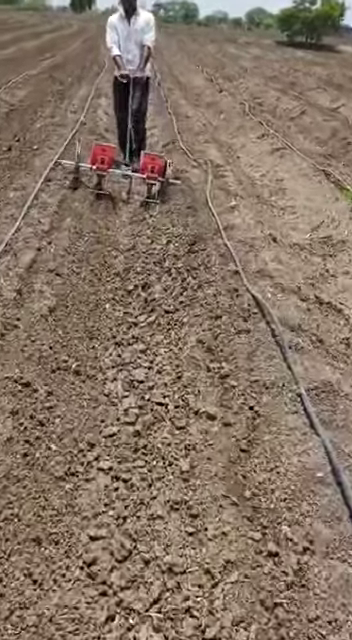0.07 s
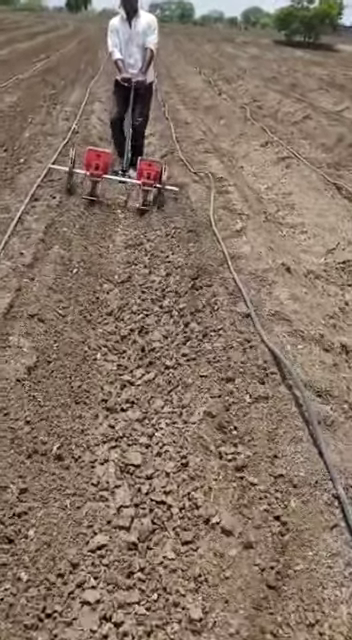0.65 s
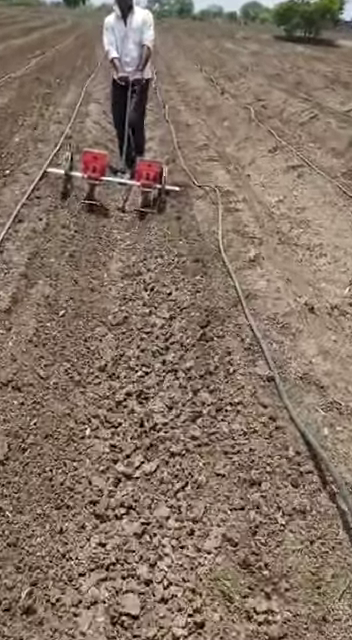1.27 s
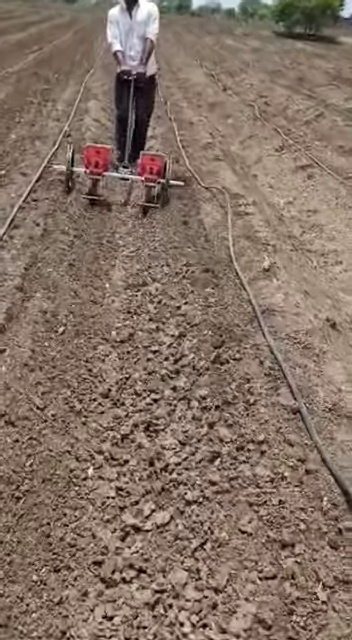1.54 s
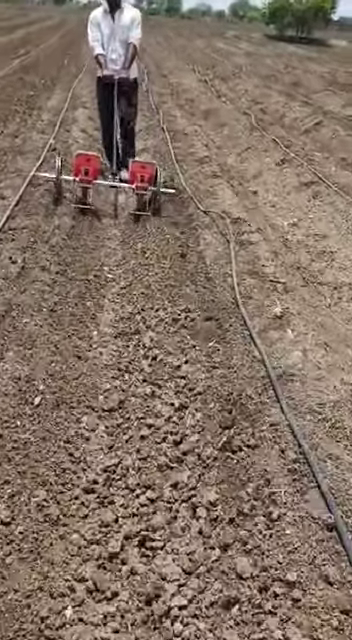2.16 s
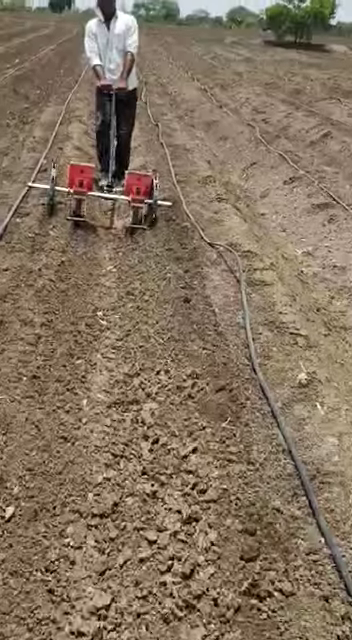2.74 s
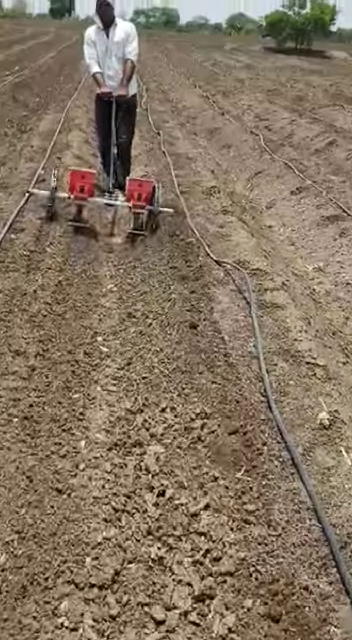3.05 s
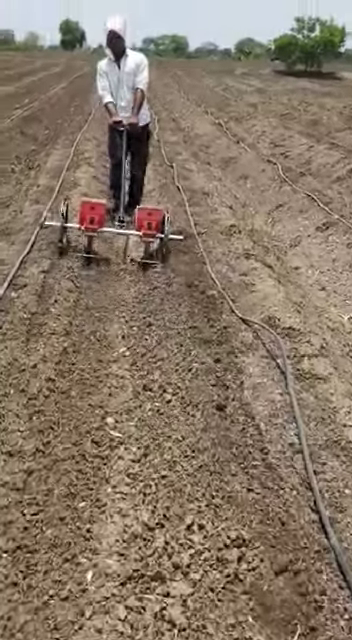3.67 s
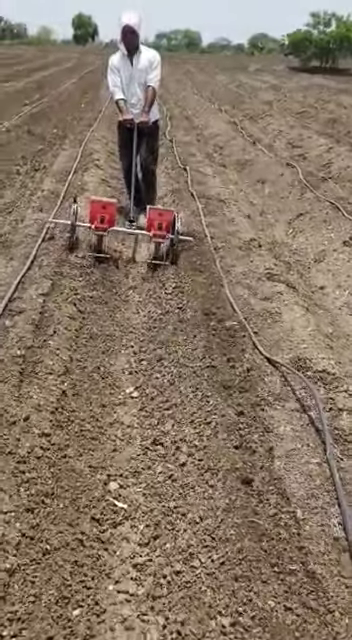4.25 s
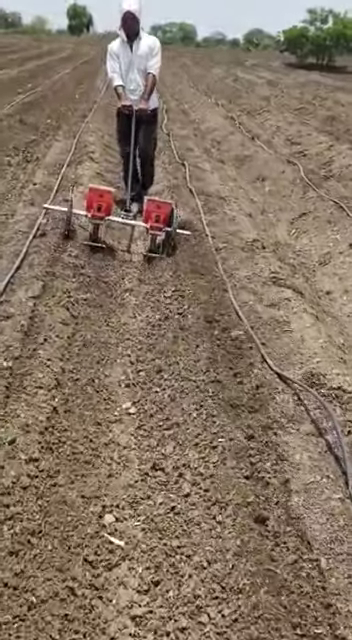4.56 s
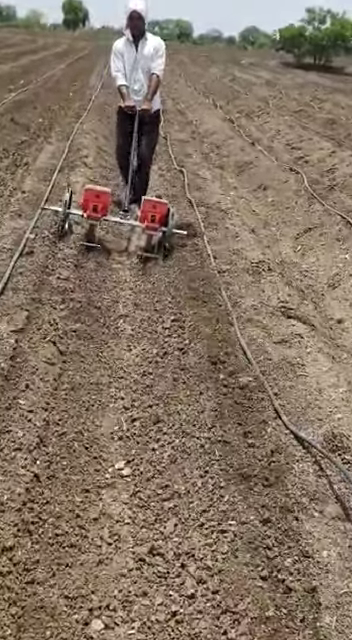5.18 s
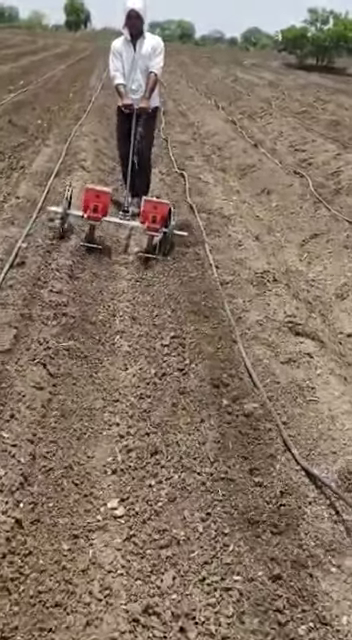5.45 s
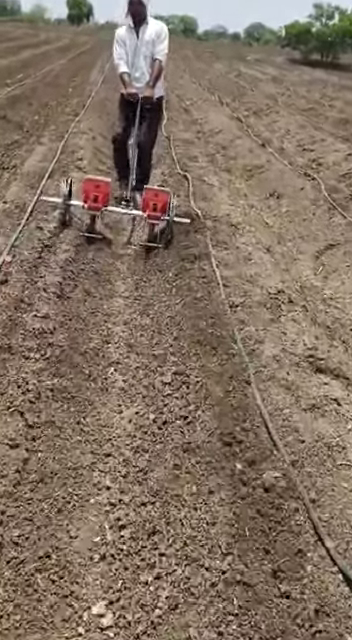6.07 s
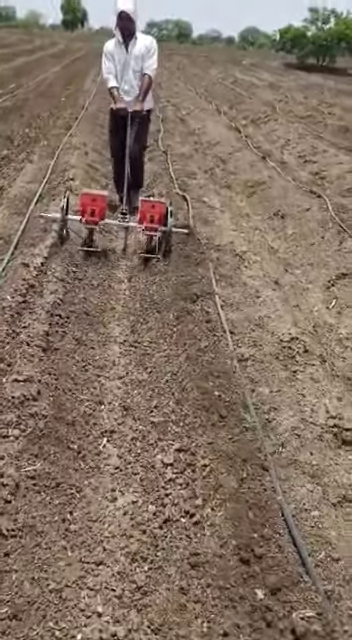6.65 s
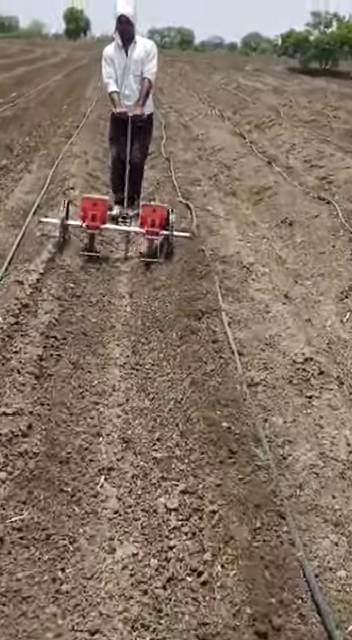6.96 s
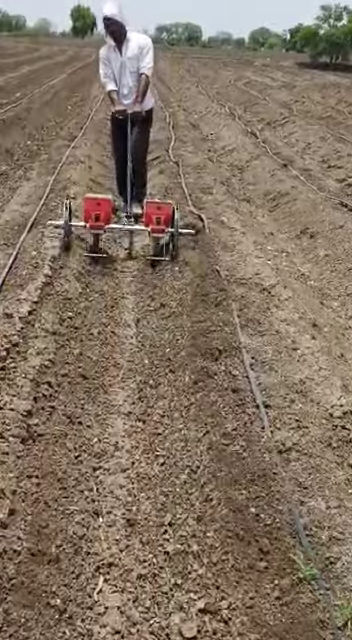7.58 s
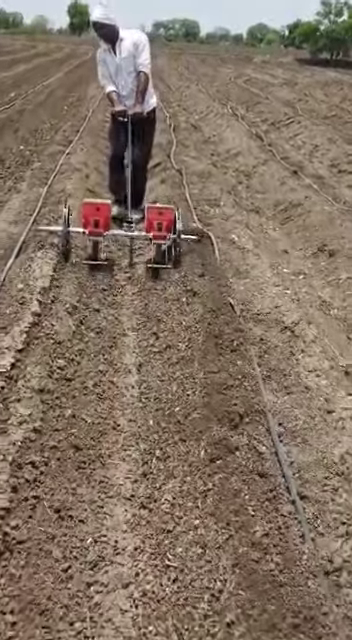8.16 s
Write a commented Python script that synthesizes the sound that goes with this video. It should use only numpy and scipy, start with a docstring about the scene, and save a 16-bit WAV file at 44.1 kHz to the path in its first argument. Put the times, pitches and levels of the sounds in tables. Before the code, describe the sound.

Wind buffets the microphone over the uneven metal clanking of a seed drill being pushed across a field, with soft footsteps.

```python
"""A hand-pushed two-row seed drill clanks and rattles over dry tilled soil, a few metres away.
Impacts in its loose joints excite the damped modes of the steel frame and drive, and two faint, high
squeaks slip in. Close footsteps crush clods in bursts of tiny fractures. Turbulence in a light
wind rumbles and pops on the microphone, over a steady high hiss and the hush of open land."""
import sys
import numpy as np
from scipy import signal
from scipy.fft import rfft, irfft
from scipy.io import wavfile
from scipy.ndimage import uniform_filter1d, minimum_filter1d

SR = 44100
rng = np.random.default_rng(int(sys.argv[2]) if len(sys.argv) > 2 else 0)


def dump_mix(stems):
    """Bounce the given channels to the path in sys.argv[1] as a 16-bit WAV at rate SR."""
    frames = np.atleast_2d(stems).T  # one column per channel
    limited = np.clip(frames, -1, 1)  # hard clip at full scale
    pcm = np.round(limited * 32767).astype(np.int16)
    wavfile.write(sys.argv[1], SR, pcm)


N = 371322
T = np.arange(N) / SR

# Loud knocks: start_s, frame_db, pitch_hz, drive_db, bar_db (levels before each part's own gain)
CLANKS = [(0.3364, -32.5, 1490, -52, -46), (0.394, -30, 1520, -49, -46), (0.4157, -25.5, 1450, -39, -43),
          (0.7476, -31, 1580, -42.5, -50), (0.7976, -24.5, 1530, -42, -43), (1.0438, -28.5, 1500, -42, -44),
          (1.2026, -26, 1520, -43, -44.5), (1.2693, -31, 1470, -47, -40), (1.3376, -19, 1450, -33, -30.5),
          (1.4227, -31.5, 1680, -55, -43), (1.55, -28.5, 1480, -43.5, -41), (1.708, -29, 1640, -52, -47),
          (1.8888, -21.5, 1590, -44.5, -39), (2.2323, -32.5, 1660, -52, -63), (2.4908, -28, 1540, -46, -52),
          (2.5398, -29.5, 1810, -48, -53), (2.7329, -34, 1500, -59, -51), (3.0257, -29.5, 1330, -42.5, -56),
          (3.1808, -29.5, 1450, -46, -39), (3.2573, -19.5, 1460, -36, -35), (3.3, -23.5, 1680, -37, -41),
          (3.5792, -19, 1690, -30.5, -46), (4.3565, -29, 1560, -44, -49), (4.8416, -29.5, 1830, -32, -58),
          (4.9836, -21, 1550, -36, -31), (5.008, -18, 1640, -32.5, -47), (5.2203, -37.5, 1570, -49, -52),
          (5.5294, -27, 1600, -41, -45), (5.72, -27, 1450, -41, -48), (5.9481, -30, 1550, -43, -55),
          (6.1129, -32, 1470, -46, -45), (6.2935, -32.5, 1490, -56, -45), (6.3257, -30, 1550, -44.5, -46),
          (6.361, -26.5, 1670, -49, -57), (6.403, -27.5, 1480, -46.5, -43),
          (6.4711, -23.5, 1530, -38, -40.5), (6.5965, -29, 1490, -49, -48), (6.8012, -36.5, 1500, -54, -44),
          (6.8816, -21, 1620, -30.5, -36), (6.9805, -20.5, 1540, -33, -40), (7.0663, -25, 1500, -50, -41),
          (7.0917, -22.5, 1840, -38, -37), (7.2069, -25.5, 1860, -45.5, -52),
          (7.3474, -16.5, 1610, -34.5, -33.5), (7.4924, -33, 1500, -55, -47), (7.5692, -31, 1490, -42, -50),
          (7.6068, -26, 1460, -43.5, -42), (7.8046, -24.5, 1540, -40, -41), (7.9361, -25, 1520, -42, -43),
          (7.9858, -29, 1200, -42.5, -55), (8.1983, -16.5, 1530, -33.5, -35),
          (8.4085, -24, 1600, -40.5, -49)]
# Modes of the steel frame: pitch_hz, relative_db, t60_s
FRAME_MODES = [(282, -8, 0.065), (385, -10.5, 0.086), (560, -24, 0.032), (695, -21.5, 0.12),
               (916, -22.5, 0.019), (1077, -26, 0.092), (1204, -10, 0.053), (1403, 0.5, 0.012),
               (1534, -17.5, 0.089), (1584, -1.5, 0.025), (1670, -7, 0.028), (1826, -5.5, 0.031),
               (2010, -9.5, 0.023), (2255, -6, 0.016), (2325, -8, 0.016), (2646, -24, 0.1),
               (2855, -9.5, 0.013), (3330, -24.5, 0.015)]
# Modes of the small drive parts: pitch_hz, relative_db, t60_s
DRIVE_MODES = [(4180, -10, .01), (4810, -1.5, 0.008), (5230, 11.5, 0.011), (5680, 5, 0.03),
               (6345, 10, 0.02), (6850, 15.5, 0.011), (7024, 5, 0.024), (7620, 2, 0.012), (9190, -7, 0.019),
               (10870, -4, 0.0047), (10400, 5, 0.0092), (13900, -15, .01)]

def drill_clanks():
    """Impact excitation: each knock of a loose joint sets the frame, the drive and one bar ringing."""
    frame_gain_db, drive_gain_db, bar_gain_db = -3, 2.5, 1.5
    out = np.zeros(N)
    for start_s, frame_db, pitch_hz, drive_db, bar_db in CLANKS:
        frame = modal_response(FRAME_MODES, pitch_hz, focus_db=3, scatter_db=2.5, detune=.028)
        drive = modal_response(DRIVE_MODES, 5200, focus_db=-2, scatter_db=2, detune=.035)
        clang = strike(frame, contact_s=.015, bounce_s=.0048, bounce=.18, scrape=.035, crack=.0094)
        clink = strike(drive, contact_s=.0076, bounce_s=.004, bounce=.095, scrape=.038, crack=.098)
        add(out, start_s, undb(frame_db + frame_gain_db) * clang)
        add(out, start_s, undb(drive_db + drive_gain_db) * clink)
        add(out, start_s, undb(bar_db + bar_gain_db) * loose_bar())
    return out

def modal_response(modes, centre_hz, focus_db, scatter_db, detune):
    """Modal superposition: damped sines, varied with each blow and weighted around centre_hz."""
    hz, db, t60_s = np.transpose(modes)[:, :, None]
    t = T[:SR // 5]
    level_draw, pitch_draw, phase = rng.standard_normal((3, len(modes), 1))
    nearness = np.exp(-(np.log2(hz / centre_hz) / .22) ** 2)
    gain = undb(db + scatter_db * level_draw + focus_db * nearness)
    hz = hz * (1 + detune * pitch_draw * t60_s.min() / t60_s)  # heavily damped modes shift most
    return np.sum(gain * np.exp(-np.log(1000) * t / t60_s) * np.sin(2 * np.pi * (hz * t + phase)), 0)

def strike(response, contact_s, bounce_s, bounce, scrape, crack):
    """Convolution: the force of a gritty contact and its rebound drives a part's impulse response."""
    t = T[:SR // 25]
    contact = np.exp(-t / contact_s)
    force = scrape * rng.standard_normal(len(t)) * contact
    force[0] += 1
    rebound_at = int(np.clip(bounce_s * rng.uniform(.7, 1.3) * SR, 1, len(t) - 1))
    force[rebound_at] += bounce * rng.choice([-1, 1])
    x = signal.fftconvolve(force, response)
    x /= np.sqrt(uniform_filter1d(x ** 2, size=SR // 200).max())  # loudest 5 ms to rms 1
    x[:len(t)] += crack * rng.standard_normal(len(t)) * contact
    return x * (1 - np.exp(-T[:len(x)] / .00039))

def loose_bar(pitch_hz=1494, t60_s=.23, rise_s=.0031):
    """Free vibration: one loosely held bar rings on, at a slightly different pitch each time."""
    t = T[:SR // 3]
    hz = pitch_hz * (1 + .005 * rng.standard_normal())
    envelope = np.exp(-np.log(1000) * t / t60_s) * (1 - np.exp(-t / rise_s))
    return envelope * np.sin(2 * np.pi * hz * t)

# Level of the faintest rattles, higher on rough ground: time_s, level_db
RATTLE_FLOOR = [(0, -51.5), (1.4, -51), (2.1, -60), (3.2, -53), (4.0, -62), (5.9, -55.5), (6.6, -52),
                (8.4, -57)]

def drill_rattles(count=200, range_db=16):
    """Play in the joints: light, uneven impacts excite the frame's modes, most of them faintly."""
    out = np.zeros(N)
    for k, (late, size) in enumerate(rng.random((count, 2))):
        frame = modal_response(FRAME_MODES, 1760, focus_db=0, scatter_db=2, detune=.013)
        rattle = strike(frame, contact_s=.0092, bounce_s=.0062, bounce=.54, scrape=.072, crack=.06)
        start_s = (k + 2 * late) / count * N / SR
        add(out, start_s, undb(range_db * size ** 2) * rattle)
    return out * undb(curve(RATTLE_FLOOR))

# Brief faint metal tones, one frame ring and two higher squeaks: start_s, length_s, pitch_hz, level_db
METAL_TONES = [(0.6, 0.086, 1517, -45), (0.675, 0.064, 4900, -55), (3.32, 0.089, 2680, -55)]

def metal_tones():
    """Single-mode vibration: faint pure tones swell and fade, one frame ring and two higher squeaks."""
    out = np.zeros(N)
    for start_s, length_s, pitch_hz, level_db in METAL_TONES:
        t = T[:int(length_s * SR)]
        envelope = np.sin(np.pi * t / length_s)
        add(out, start_s, undb(level_db) * envelope * np.sin(2 * np.pi * pitch_hz * t))
    return out

# Feet pressing on the soil: start_s, length_s, crunch_db, dust_db
STEPS = [(0.145, 0.11, -40.5, -47), (0.806, 0.095, -40, -49), (0.94, 0.2, -48, -59), (1.53, 0.26, -50, -74),
         (2.29, 0.16, -46.5, -59), (2.881, 0.093, -55.5, -52), (3.035, 0.068, -46.5, -61),
         (3.658, 0.27, -50, -54), (4.505, 0.17, -45.5, -62), (5.25, 0.27, -50, -56),
         (6.127, 0.23, -50.5, -54), (6.975, 0.17, -45, -62), (7.788, 0.052, -45.5, -50)]
# Spectra of coarse grains and of fine dust: frequency_hz, relative_db
CRUNCH_SPECTRUM = [(500, 7), (1000, 4), (2000, 1.5), (3000, -3.5), (4500, -2), (6500, -9.5), (9000, -13),
                   (15500, -28)]
DUST_SPECTRUM = [(4000, 5), (7000, -0.5), (11000, -3), (15500, -5)]

def footsteps():
    """Granular crushing: clods break in dense random impulses whose level follows the foot's load."""
    crunch_gain, dust_gain, t = np.zeros(N), np.zeros(N), T[:SR // 2]
    for start_s, length_s, crunch_db, dust_db in STEPS:
        landing = np.minimum(t / .012, 1)
        easing = np.exp(-.3 * t / length_s)
        settling = np.exp(-np.maximum(t - .85 * length_s, 0) / .045)
        load = landing * easing * settling
        add(crunch_gain, start_s, undb(crunch_db) * load)
        add(dust_gain, start_s, undb(dust_db) * load)
    crumbling = undb(2.3 * wander(40) + 2 * wander(150))
    crunch = colour(grains(rate_hz=3200, spread_db=4.5), CRUNCH_SPECTRUM)
    dust = colour(grains(rate_hz=2500, spread_db=5), DUST_SPECTRUM)
    return crumbling * (crunch_gain * crunch + dust_gain * dust)

# Crumbs of earth breaking underfoot: start_s, peak_db, pitch_hz
CRUMBS = [(0.509, -35, 12100), (2.4244, -41, 12100), (2.9146, -35.5, 8210), (2.9537, -35, 13500),
          (3.3978, -33.5, 12000), (4.9028, -40, 8700), (5.668, -35.5, 12100), (8.0227, -36, 14400),
          (8.14, -32.5, 11900)]

def crumbs(trickle_count=130):
    """Brittle fracture: single crumbs snap, and tiny ones keep trickling from the disturbed soil."""
    out = np.zeros(N)
    for start_s, peak_db, pitch_hz in CRUMBS:
        add(out, start_s, undb(peak_db) * snap(pitch_hz))
    for when, size, pitch in rng.random((trickle_count, 3)):
        pitch_hz = 5500 + 9000 * pitch
        add(out, when * N / SR, undb(-50.5 + 9.6 * size ** 2) * snap(pitch_hz))
    return out

def snap(pitch_hz, decay_s=.003):
    """Damped resonance: a breaking crumb's burst of noise gathers round one pitch; peak 1."""
    t = T[:SR // 40]
    burst = rng.standard_normal(len(t)) * np.exp(-t / decay_s)
    x = signal.lfilter(*signal.iirpeak(pitch_hz, Q=4, fs=SR), burst)
    return x / np.abs(x).max()

# Strength of the breeze at the microphone: time_s, rumble_db
BREEZE = [(0, -36), (0.16, -23.5), (0.6, -26.5), (1.35, -22.5), (1.98, -30.5), (2.85, -30), (3.9, -33),
          (4.05, -39), (4.3, -32.5), (5.1, -33.5), (5.55, -34.5), (6.24, -29.5), (6.33, -35), (6.67, -38),
          (6.8, -31), (8.4, -25)]
# Gusts that swell over the breeze: crest_s, half_length_s, rumble_db, flutter_db
GUSTS = [(0.264, 0.017, -32, -30), (0.374, 0.028, -16.5, -38), (0.877, 0.17, -37, -12.5),
         (1.118, 0.046, -21, -18.5), (1.255, 0.029, -8.5, -30), (1.679, 0.087, -13, -24.5),
         (2.512, 0.085, -22, -40), (3.82, 0.083, -24.5, -41), (4.746, 0.011, -21, -62),
         (5.935, 0.025, -16, -38.5), (6.212, .05, -28, -37), (6.763, 0.027, -23.5, -53),
         (7.362, 0.037, -22, -44), (7.456, 0.032, -21, -49), (7.72, 0.034, -20, -37),
         (8.34, 0.026, -15, -24.5)]
# Single eddies, each a broad swirl round a tight, fast core: time_s, swirl_db, core_db
EDDIES = [(0.184, -17, -30.5), (0.275, -23, -13.5), (0.629, -20, -13.5), (0.681, -17, -16),
          (0.718, -16, -8.5), (0.95, -8, -15), (1.035, -14, -8.5), (1.143, -3.5, -48), (1.479, -14, -37),
          (1.568, -21, -21.5), (1.832, -37, -18), (2.432, -20, -50), (2.626, -16, -35), (2.733, -17, -54),
          (2.795, -14, -63), (3.029, -15, -28.5), (3.565, -19, -38), (3.606, -11.5, -30), (4.454, -22, -24),
          (4.521, -22, -27.5), (4.953, -20.5, -26), (5.147, -14, -28), (5.175, -19, -17.5),
          (5.793, -17, -61), (6.149, -11, -29.5), (6.221, -9.5, -16.5), (6.256, -14.5, -29),
          (6.953, -12, -31), (7.435, -17, -50), (7.987, -7, -2.5), (8.003, -2.5, -24), (8.057, -2, -1.5),
          (8.194, -10.5, -22.5), (8.326, -33, -4.5), (8.349, -9, -17), (8.379, -25, -9)]
# Spectra of the wind's low rumble and higher flutter: frequency_hz, relative_db
RUMBLE_SPECTRUM = [(20, -38), (35, -16.5), (55, -3.5), (80, 1), (115, 3.5), (170, -5.5), (240, -11),
                   (330, -25), (500, -55.5), (900, -83)]
FLUTTER_SPECTRUM = [(100, -10.5), (200, 3), (320, 1.5), (450, -5.5), (600, -15), (800, -28), (1100, -38.5),
                    (2000, -63)]

def wind(swirl_hz=153, core_hz=267, wake_db=-3, wake_s=.0072):
    """Turbulent pressure on the microphone: breeze and gusts rumble and flutter, and eddies pop."""
    rumble_gain = undb(curve(BREEZE))
    flutter_gain = undb(-15) * rumble_gain
    for crest_s, half_length_s, rumble_db, flutter_db in GUSTS:
        swell = np.exp(-((T - crest_s) / half_length_s) ** 2)
        rumble_gain = np.hypot(rumble_gain, undb(rumble_db) * swell)  # powers add
        flutter_gain = np.hypot(flutter_gain, undb(flutter_db) * swell)
    pops = np.zeros(N)
    wake = np.exp(-np.abs(T[:SR // 10] - .033) / wake_s)  # flutter crests just behind each eddy
    for time_s, swirl_db, core_db in EDDIES:
        pop = undb(swirl_db) * eddy(swirl_hz) + undb(core_db) * eddy(core_hz)
        add(pops, time_s - .009, rng.choice([-1, 1]) * pop)
        add(flutter_gain, time_s - .027, undb(core_db + wake_db) * wake)
    buffeting = wander(22)
    rumble = steady(colour(grains(rate_hz=300, spread_db=1.5), RUMBLE_SPECTRUM)) * undb(3 * buffeting)
    sputter = grains(rate_hz=330, spread_db=1) * undb(3 * wander(60))
    flutter = steady(colour(sputter, FLUTTER_SPECTRUM)) * undb(.68 * buffeting)
    return pops + rumble_gain * rumble + flutter_gain * flutter

def eddy(hz):
    """A passing vortex: one pressure swing, the derivative of a Gaussian, centred in 24 ms; peak 1."""
    phase = 2 * np.pi * hz * (T[:int(.024 * SR)] - .012)
    return phase * np.exp((1 - phase ** 2) / 2)

# Spectra of the high hiss and the lower hush: frequency_hz, relative_db
HISS_SPECTRUM = [(1470, -49), (2500, -31), (2740, 2.5), (3000, -14), (3270, -8.5), (3720, -19), (4200, -6),
                 (4640, -7), (5490, 3.5), (7170, -1.5), (8810, -24), (11000, -9.5), (12600, -15),
                 (14700, -7), (15500, -11.5)]
HUSH_SPECTRUM = [(200, -26), (500, -3), (900, -3), (1500, 4), (2500, -6.5), (4000, -12.5)]

def field(hiss_db=-55.5, hush_db=-55):
    """Broadband noise: a steady high hiss lies over the faint, wavering hush of open land."""
    hiss = colour(rng.standard_normal(N), HISS_SPECTRUM) * undb(.5 * wander(14))
    hush = colour(rng.standard_normal(N), HUSH_SPECTRUM) * undb(1.5 * wander(9))
    return undb(hiss_db) * hiss + undb(hush_db) * hush

def undb(db):
    """Decibels to amplitude ratio."""
    return 10 ** (np.asarray(db) / 20)

def curve(table):
    """Linear interpolation of (time_s, value) rows at every sample."""
    return np.interp(T, *np.transpose(table))

def add(out, start_s, x):
    """Superposition: mix x into out from start_s."""
    i = int(np.clip(start_s * SR, 0, N - 1))
    out[i:i + len(x)] += x[:N - i]

def colour(x, spectrum):
    """Spectral shaping by (frequency_hz, relative_db) rows, rolled off beyond both ends; rms 1."""
    hz, db = np.transpose(spectrum)
    f = np.maximum(np.fft.rfftfreq(N, 1 / SR), 1)
    skirts = 1 / (1 + (hz[0] / 2 / f) ** 4) / (1 + (f / 2 / hz[-1]) ** 4)
    gain = undb(np.interp(np.log(f), np.log(hz), db))
    shaped = irfft(rfft(x) * skirts * gain, N)
    return shaped / np.sqrt(np.mean(shaped ** 2))

def wander(rate_hz):
    """Random modulation: chance values joined by ramps, with a spread near 1."""
    hold = int(SR / rate_hz)
    stairs = np.repeat(rng.standard_normal(N // hold + 1), hold)
    return 1.2 * uniform_filter1d(stairs, hold)[:N]

def grains(rate_hz, spread_db):
    """Shot noise: random impulses, mostly small and a few large."""
    size = undb(spread_db * np.minimum(rng.exponential(size=N), 4))
    return (rng.random(N) < rate_hz / SR) * size * rng.choice([-1, 1], N)

def steady(x):
    """Envelope normalisation: hold the slow level at rms 1 and keep the quick flutter."""
    return x / np.sqrt(uniform_filter1d(x ** 2, size=SR // 12) + 1e-9)

def scene():
    """Superposition in the open air: drill, feet, wind and field sum at one microphone."""
    drill = drill_clanks() + drill_rattles() + metal_tones()
    return (drill + footsteps() + crumbs() + wind() + field())[None]

def record(dry, low_hz=38, top_hz=15700, ceiling=.9, release_db_per_s=22):
    """Band and peak limiting: the gain dips just ahead of strong peaks and recovers slowly."""
    x = signal.sosfilt(signal.butter(2, low_hz, "high", fs=SR, output="sos"), dry)
    over_db = np.maximum(20 * np.log10(np.abs(x) / ceiling + 1e-9), 0)
    release_db = release_db_per_s * T
    duck_db = np.maximum.accumulate(over_db + release_db, axis=1) - release_db
    look_ahead = minimum_filter1d(undb(-duck_db), size=2400)
    gain = uniform_filter1d(look_ahead, size=400)
    return signal.sosfilt(signal.ellip(10, .2, 70, top_hz, fs=SR, output="sos"), x * gain)

dry = scene()
out = record(dry)
dump_mix(out)
```